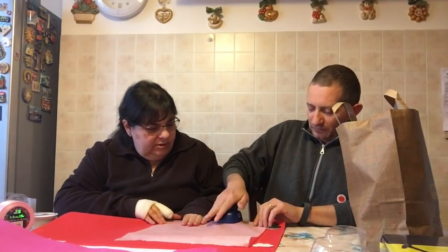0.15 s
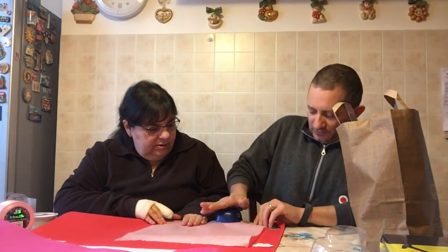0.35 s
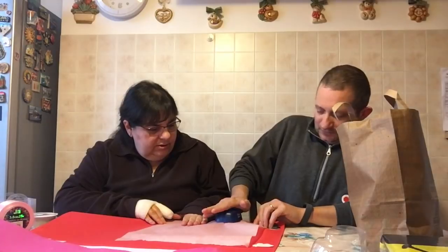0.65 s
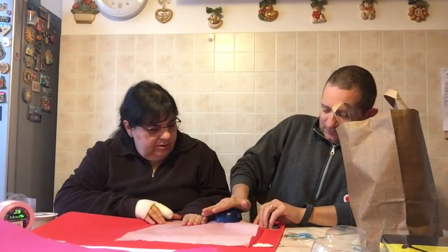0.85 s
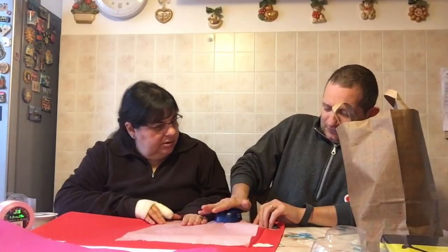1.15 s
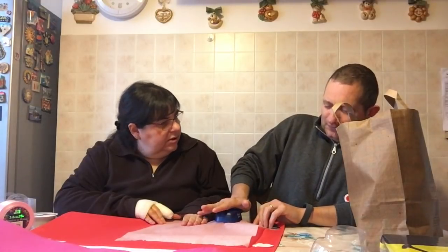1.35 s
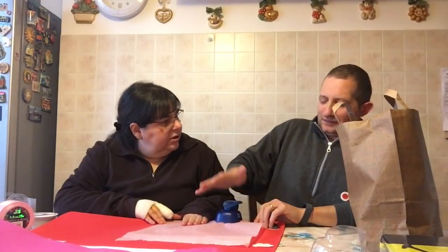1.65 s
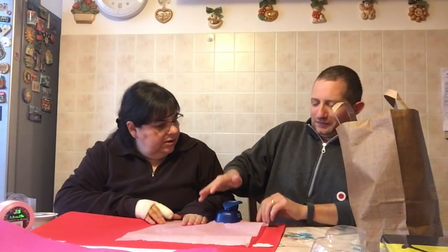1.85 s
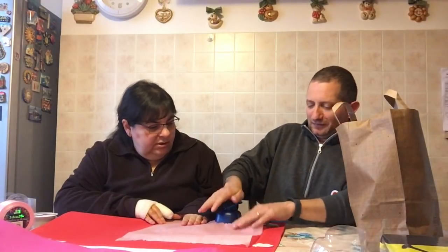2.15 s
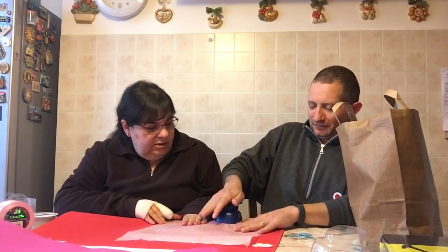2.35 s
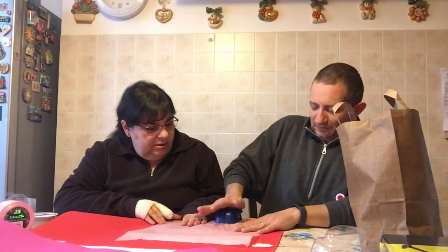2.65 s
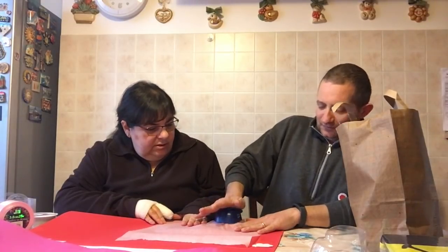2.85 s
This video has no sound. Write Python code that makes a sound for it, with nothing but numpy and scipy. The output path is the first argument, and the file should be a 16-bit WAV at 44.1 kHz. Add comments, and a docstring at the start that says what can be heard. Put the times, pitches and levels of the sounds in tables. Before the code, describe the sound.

A plastic paper punch clacks on a table at about 0.3 seconds, ticks, and clunks through the paper at 0.6. After faint rustling it scrapes back up and knocks around 1.7 seconds, with small spring clicks. The sheet slides briefly at 2.2. A hard second press at about 2.6 seconds gives the loudest clunk, leaving the table ringing briefly in a slightly echoing room.

```python
"""Paper punch in a tiled kitchen

A plastic punch is worked by hand on a table. The lever takes up, bites through the paper, scrapes
back up and knocks; the sheet is slid along; a hard second press slams home. Each impact rattles the
cutter and excites the modes of housing and table. The spring ticks, friction makes sleeves and paper
rustle, and the room reverberates."""
import sys
import numpy as np
from scipy import signal
from scipy.fft import rfft, irfft
from scipy.io import wavfile
from scipy.ndimage import uniform_filter1d, map_coordinates

SR = 44100
rng = np.random.default_rng(int(sys.argv[2]) if len(sys.argv) > 2 else 0)


def to_wav(s):
    """Save 16-bit WAV."""
    ch = np.atleast_2d(s).T  # columns
    pcm = np.round(np.clip(ch, -1, 1) * 32767)  # PCM
    wavfile.write(sys.argv[1], SR, pcm.astype(np.int16))


N = 132300
TIME = np.arange(N) / SR


def amp(db):
    """Amplitude ratio of a level in decibels."""
    return 10 ** (np.asarray(db) / 20)


def on_log_axis(hz, points):
    """Interpolation of (frequency, value) points along a logarithmic frequency axis."""
    freqs, values = np.array(points, float).T
    return np.interp(np.log(np.maximum(hz, 1)), np.log(freqs), values)


def colour(x, points):
    """Minimum-phase filtering: folding the cepstrum makes a (frequency, gain) response causal."""
    size = 8192
    gain = amp(on_log_axis(np.fft.rfftfreq(size, 1 / SR), points))
    cepstrum = irfft(np.log(gain))
    cepstrum[1:size // 2] *= 2
    cepstrum[size // 2 + 1:] = 0
    return signal.fftconvolve(x, irfft(np.exp(rfft(cepstrum))))[:len(x)]


def grains(spread):
    """Contact noise: dense tiny collisions of log-normal size, scaled to unit rms."""
    log_size = np.repeat(rng.standard_normal(N // 12 + 1), 12)[:N]
    x = rng.standard_normal(N) * np.exp(spread * np.clip(log_size, -2, 2))
    return x / x.std()


def ring(modes, t, rise_s):
    """Modal superposition: damped sinusoids build up after a push, neighbours in opposite phase."""
    swing = sum((-1) ** k * amp(db - 60 * t / t60) * np.sin(2 * np.pi * hz * t)
                for k, (hz, db, t60) in enumerate(modes))
    return swing * (1 - np.exp(-t / rise_s))


# Spectrum of the background air (frequency [Hz], level [dB])
AIR_SPECTRUM = [(20, -104), (45, -47.5), (90, -44.5), (300, -48.5), (600, -54.5), (1500, -60.5),
                (4000, -66.5), (13000, -71), (15500, -86)]
def air():
    """Ambient noise: a faint, steady random pressure, strongest in the bass."""
    return colour(rng.standard_normal(N), AIR_SPECTRUM)


def drift(x, depth_s=0.00005, rate_hz=70):
    """Delay modulation: path lengths waver slightly, which keeps the treble of the echo smooth."""
    waver = signal.resample(rng.standard_normal(int(len(x) / SR * rate_hz)), len(x))
    return map_coordinates(x, [np.arange(len(x)) + depth_s * SR * waver], order=5)


# Reverberation time of the tiled room (frequency [Hz], T60 [s])
ROOM_DECAY = [(60, 0.72), (150, 0.52), (350, 0.42), (600, 0.35), (1500, 0.37), (5000, .33), (9000, .28),
              (15000, 0.17)]
def room(x, echo_db):
    """Reverberation: a diffuse field of even colour joins the direct sound, its treble dying first."""
    size, build_s = 32768, 0.00087
    t, hz = TIME[:size], np.fft.rfftfreq(size, 1 / SR)
    noise, tail = rfft(rng.standard_normal(size)), 0
    centres = np.geomspace(50, 16000, 12)
    for centre, weights in zip(centres, np.eye(len(centres))):
        band = irfft(noise * on_log_axis(hz, list(zip(centres, weights))))
        tail = tail + band * amp(-60 * t / on_log_axis(centre, ROOM_DECAY))
    spectrum = rfft(tail * (1 - np.exp(-t / build_s)))
    smoothed_power = uniform_filter1d(np.abs(spectrum) ** 2, size=35)
    response = irfft(spectrum / np.sqrt(smoothed_power + 1e-12))[:size * 3 // 4]
    return x + amp(echo_db) * drift(signal.fftconvolve(x, response)[:len(x)])


# Strokes of paper and sleeves (time [s], duration [s], level [dB], tilt [dB/octave])
RUB_STROKES = [(0.012, 0.099, -69, 0), (0.116, 0.049, -59.5, 0.5), (0.281, 0.027, -62.5, -0.5),
               (0.393, 0.034, -46.5, -3), (0.491, 0.086, -51, -2), (0.585, 0.0083, -38.5, 3.5),
               (0.737, 0.23, -60.5, -2), (0.998, 0.044, -61, 0.5), (1.414, 0.043, -63.5, -1.5),
               (1.499, 0.23, -68, -2.5), (1.857, 0.066, -55.5, 0.5), (2.073, 0.048, -65.5, -1.5),
               (2.202, 0.051, -43.5, 1.5), (2.243, 0.096, -42.5, 1.95), (2.481, 0.024, -66, -3)]
# Spectrum of the rustle (frequency [Hz], gain [dB])
RUSTLE_SPECTRUM = [(80, -18), (280, -2), (500, -2), (1150, 1.5), (1900, 1.5), (6200, 0), (7600, -4.5),
                   (8700, 0.5), (10000, -1.5), (12800, 3), (15500, -13)]
def rubs(fade_s=0.0061, flutter_db=2.8, flutter_hz=90):
    """Stick-slip friction: paper fibres and cloth catch and release in short, fluttering strokes."""
    out = np.zeros(N)
    for start, length, db, tilt in RUB_STROKES:
        t = TIME[:int((length + 0.1) * SR)]
        stroke = np.clip(np.minimum(t, length + fade_s - t) / fade_s, 0, 1)
        tilted = [(hz, gain + tilt * np.log2(hz / 6000)) for hz, gain in RUSTLE_SPECTRUM]
        add(out, start, amp(db) * colour(stroke * grains(spread=0.59)[:len(t)], tilted))
    flutter = signal.resample(rng.uniform(-1.1, 1, int(N / SR * flutter_hz)), N)
    return out * amp(flutter_db * flutter)


# Drag of the punch's foot over the table (time [s], duration [s], level [dB])
FOOT_DRAG = (2.2, 0.18, -47.5)
# Resonances sounded by the foot's drag (frequency [Hz], gain [dB])
DRAG_RESPONSE = [(300, 0), (520, -23), (810, 8.5), (980, -3), (1370, 10), (1800, 3.5), (5000, -26)]
def foot_drag():
    """Frictional excitation: the punch's foot judders over the table and sounds hollow resonances."""
    start, length, db = FOOT_DRAG
    speed = np.sin(np.pi * np.clip((TIME - start) / length, 0, 1))
    return amp(db) * colour(speed * grains(spread=0.59), DRAG_RESPONSE)


# Ticks of the spring and of tearing paper (time [s], level [dB], lower edge [Hz], upper edge [Hz])
TICK_EVENTS = [(0.3849, -15.5, 704, 7100), (0.4348, -4.5, 11200, 14200), (0.439, -6, 11200, 14300),
               (0.4425, -13, 10800, 14000), (0.451, -3.5, 5480, 6320), (0.452, -15, 1490, 15000),
               (0.455, -21, 8100, 15000), (0.491, -24, 1500, 15000), (0.587, -16, 890, 14500),
               (0.590, -7, 9900, 14500), (0.596, -4.5, 10400, 14400), (1.579, -26, 1200, 11000),
               (1.6723, -12, 2000, 14900), (1.6762, -7, 9700, 14400), (1.8072, -14.5, 6750, 14600),
               (1.8118, -19.5, 8100, 14600), (1.8147, -7.5, 1800, 2310), (2.207, -23, 1000, 14100),
               (2.3315, -27, 4000, 15100), (2.488, -27, 1310, 5800)]
def ticks(decay_s=0.00056):
    """Band-limited transients: each snap is a sharp click and a tiny crunch within its own band."""
    out, t = np.zeros(N), TIME[:1024]
    lead = 32  # samples ahead of the onset
    for start, db, low_hz, high_hz in TICK_EVENTS:
        band = signal.butter(2, [low_hz, high_hz], "band", fs=SR, output="sos")
        spectrum = rfft(rng.standard_normal(len(t)) * np.roll(np.exp(-t / decay_s), lead))
        white_snap = irfft(spectrum / np.abs(spectrum))
        add(out, start - lead / SR, amp(db) * signal.sosfilt(band, white_snap))
    return out


# Spectrum of the bright crack and crunch (frequency [Hz], gain [dB])
CRACK_SPECTRUM = [(300, -18), (2000, 0), (4000, -2.5), (7200, -7), (8700, -0.5), (10200, -4.5),
                  (12700, 2.5), (15500, -34)]
def crack(contacts):
    """Broadband radiation: very brief contacts carry energy far into the treble."""
    return colour(contacts, CRACK_SPECTRUM)


# Plunger strokes (time [s], duration [s], final groan [dB], final crunch [dB], groan swell [dB])
PLUNGER_STROKES = [(0.313, 0.018, -35, -44, 22.5), (0.597, 0.02, -43.5, -32.5, 2.5),
                   (1.577, 0.096, -37.5, -40, 14.5), (2.6163, 0.03, -21, -24.5, 30)]
# Spectrum of the plunger groaning in its guide (frequency [Hz], gain [dB])
GROAN_SPECTRUM = [(50, -6), (280, 8.5), (750, 7.5), (1200, 6), (1750, 8), (3300, -1.5), (7000, -9.5),
                  (15500, -2)]
def scrapes(crunch_exponent=2.2):
    """Sliding friction: plastic groans on plastic as force grows; a bright crunch grows faster still."""
    groan = crunch = 0
    for start, length, groan_db, crunch_db, swell_db in PLUNGER_STROKES:
        force_db = swell_db * np.clip((TIME - start) / length - 1, -1, 0)
        moving = (TIME >= start) * (TIME < start + length)
        groan = groan + moving * amp(groan_db + force_db)
        crunch = crunch + moving * amp(crunch_db + crunch_exponent * force_db)
    return colour(groan * grains(spread=0.28), GROAN_SPECTRUM) + crack(crunch * grains(spread=0.28))


# Spectrum of a thud on the table (frequency [Hz], gain [dB])
THUD_SPECTRUM = [(25, -26), (45, 1), (70, 6.5), (130, 4.5), (220, -3.5), (350, 5), (560, -14), (1200, -7.5),
                 (4000, -52)]
def thud(force):
    """Impulse response: the table answers a sudden push mainly at low frequencies."""
    return colour(force, THUD_SPECTRUM)


# Bounces of the punch's foot (time [s], level [dB])
FOOT_BOUNCES = [(0.5, -6), (0.6282, 13.5), (0.6453, 10.5), (1.701, 9)]
def bounces():
    """Rebound: the foot drops back on the table in dull thumps with no rattle."""
    pushes = np.zeros(N)
    for start, db in FOOT_BOUNCES:
        add(pushes, start, amp([db]))
    return thud(pushes)


# Modes of the table under the punch (frequency [Hz], level [dB], T60 [s])
TABLE_MODES = [(58.3, -36, 0.8), (91, -57, 0.33), (132.5, -30, 0.35), (160.3, -23, 0.45),
               (227.5, -25.5, 0.27), (283.6, -21, 0.26), (349.8, -30.5, 0.54), (392, -21.5, 0.3),
               (452.8, -13.5, 0.2), (536.2, -22.5, 0.39), (687, -20, 0.085), (712.6, -21, 0.2),
               (901.6, -21, 0.25), (1147, -19.5, 0.065)]
def table_ring(t):
    """Free vibration: the lightly damped table rings on after a blow."""
    return ring(TABLE_MODES, t, rise_s=0.0012)


# Modes of the plastic housing (frequency [Hz], level [dB], T60 [s])
HOUSING_MODES = [(954, -6.5, 0.02), (1360, -17, 0.065), (1520, 5, 0.012), (1905, -3, 0.021),
                 (2496, -17.5, 0.066)]
def housing_snap(t):
    """Heavy damping: the modes of the plastic die so fast that they are heard as a snap."""
    return ring(HOUSING_MODES, t, rise_s=0.0015)


# Spectrum of the punch's clack (frequency [Hz], gain [dB])
CLACK_SPECTRUM = [(60, -49), (250, -8.5), (520, 5), (810, 1), (1300, 1.5), (1700, -3), (2400, -1),
                  (3200, -11.5), (8000, -17)]
def clack(force, centre_hz, peak_db):
    """Forced response: the punch shapes the contact force, with one broad resonance on top."""
    resonance = [(centre_hz / 2, 0), (centre_hz, peak_db), (centre_hz * np.sqrt(2), 0)]
    return colour(colour(force, CLACK_SPECTRUM), resonance)


# Blows of the punch (time [s], table thud [dB], table ring [dB], housing snap [dB], clack [dB],
# clack centre [Hz], clack resonance [dB], crack [dB], rattle decay [s])
PUNCH_BLOWS = [(0.336, 0, -27.5, -40, -5, 830, 11, -7, 0.012),
               (0.353, -8.5, -30, -40, -8.5, 645, 4.5, -17, 0.0031),
               (0.6116, 10, -19.5, -23, -6, 342, 17, -3.5, 0.004),
               (1.648, -2, -25.5, -16.5, -3.5, 1590, 12, -8, 0.0043),
               (1.679, 7, -22, -46, -8, 277, 19, -20, 0.0029),
               (2.645, 17.5, -4, -14, 14, 1350, 4.5, -6, 0.0033),
               (2.6623, 20.5, -5, -37, 5.5, 449, 11, -37, 0.0037)]
def blows(rattle_rise_s=0.0003):
    """Impact excitation: each blow thumps and rings the table, snaps the housing, rattles the cutter."""
    out, t = np.zeros(N), TIME[:SR * 3 // 4]
    push = signal.unit_impulse(len(t))
    for start, thud_db, ring_db, snap_db, clack_db, centre_hz, peak_db, crack_db, decay_s in PUNCH_BLOWS:
        envelope = np.exp(-t / decay_s) * (1 - np.exp(-t / rattle_rise_s))
        rattle = grains(spread=0.9)[:len(t)] * envelope
        rattle /= np.linalg.norm(rattle)  # unit energy
        knock = amp(clack_db) * clack(0.1 * push + rattle, centre_hz, peak_db)
        body = room(amp(thud_db) * thud(push) + knock, echo_db=1.5)
        edge = room(amp(crack_db) * crack(rattle), echo_db=3)
        ringing = amp(ring_db) * table_ring(t) + amp(snap_db) * housing_snap(t)
        add(out, start, body + edge + ringing)
    return out


def add(out, start, x):
    """Linear mixing: x joins the output at the start time in seconds."""
    i = max(int(start * SR), 0)
    out[i:i + len(x)] += x[:N - i]


def scene():
    """Superposition: punch and paper are heard directly and through the room, over still air."""
    punch = blows() + room(scrapes(), echo_db=5.5) + room(bounces(), echo_db=0)
    rustle = room(rubs() + foot_drag(), echo_db=1)
    return (punch + rustle + room(ticks(), echo_db=0.5) + air())[None]


def record(dry, low_hz=40, top_hz=15750):
    """Band limiting: the microphone loses the deepest bass and the very top."""
    dry = signal.sosfilt(signal.butter(6, low_hz, "high", fs=SR, output="sos"), dry)
    return signal.sosfilt(signal.ellip(10, 0.2, 70, top_hz, fs=SR, output="sos"), dry)


dry = scene()
out = record(dry)
to_wav(out)
```